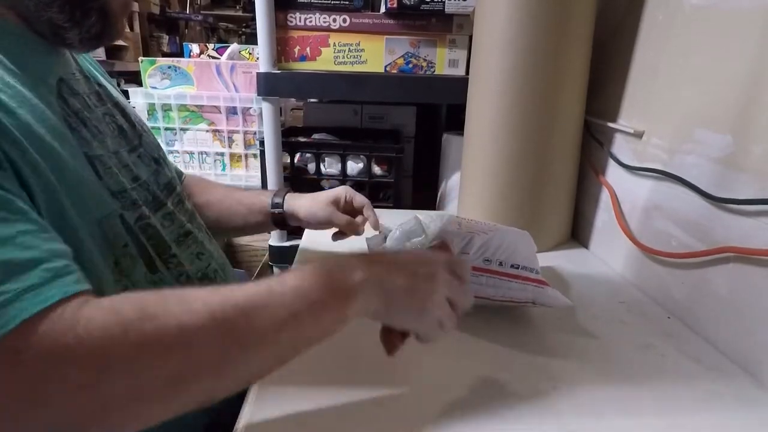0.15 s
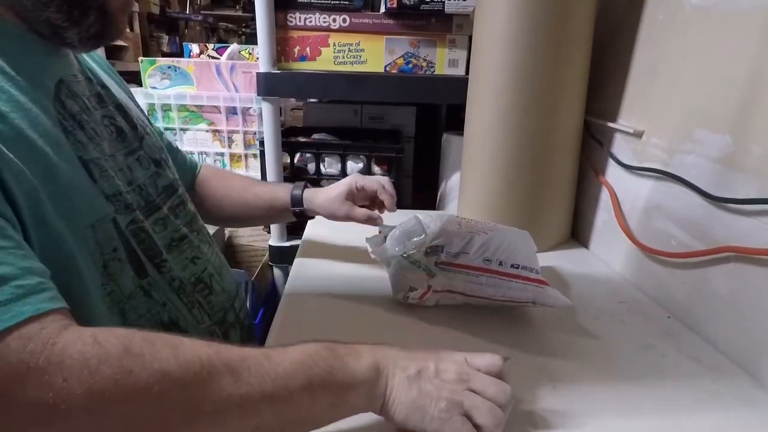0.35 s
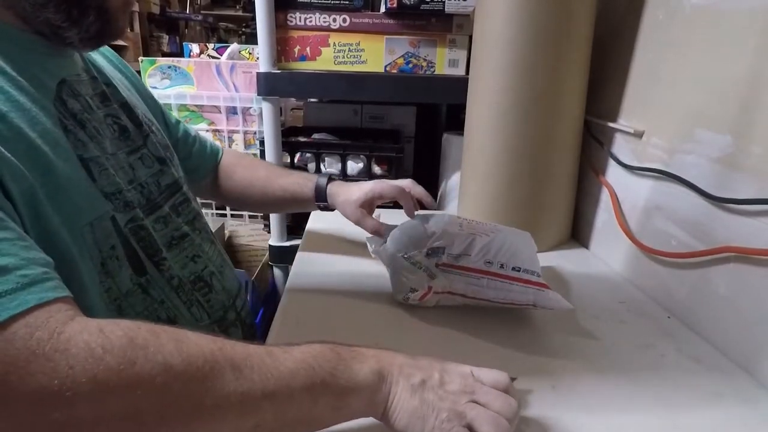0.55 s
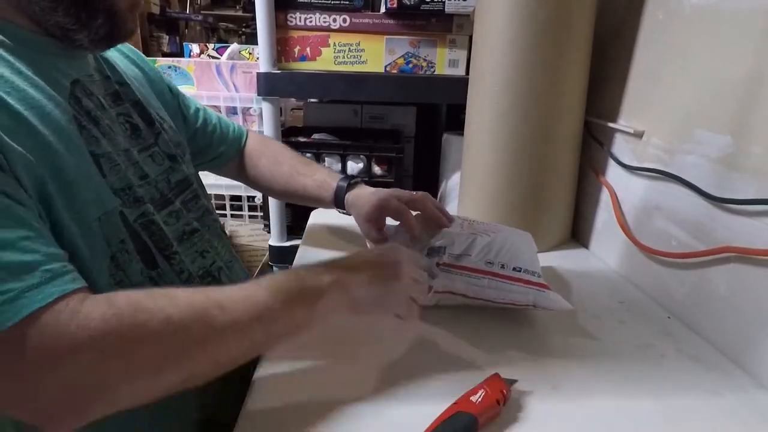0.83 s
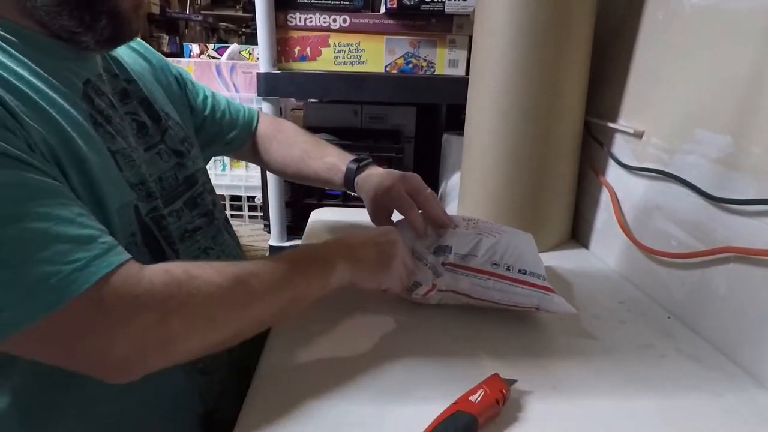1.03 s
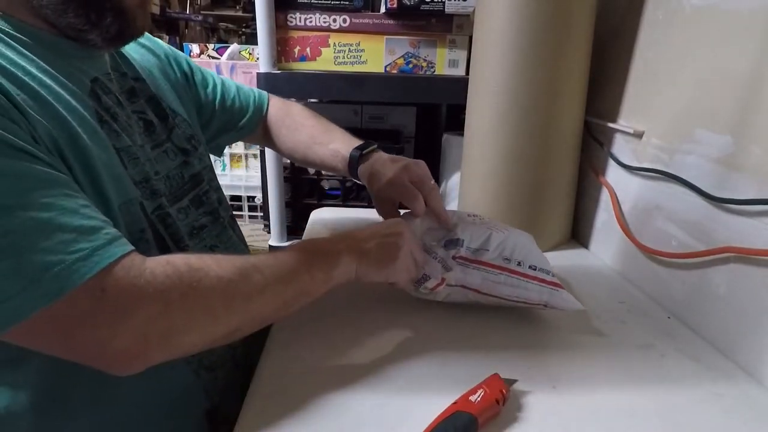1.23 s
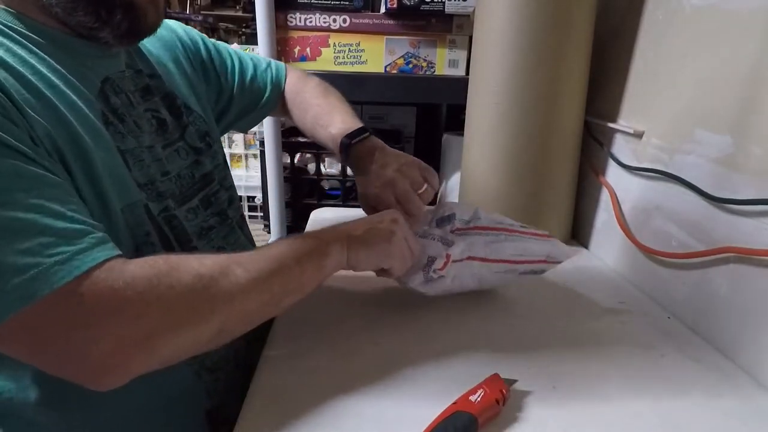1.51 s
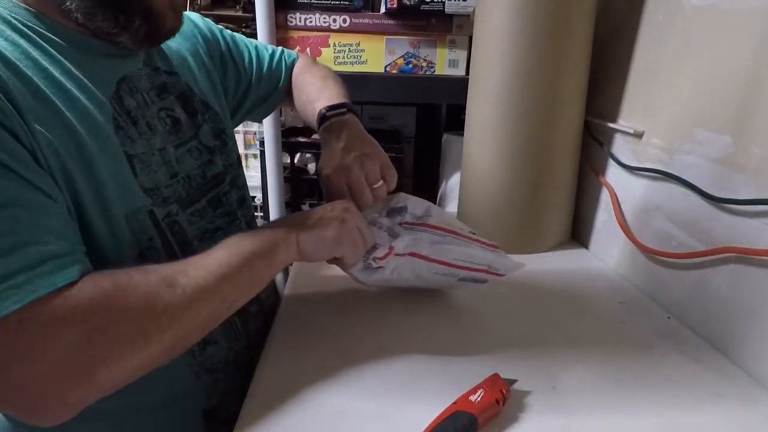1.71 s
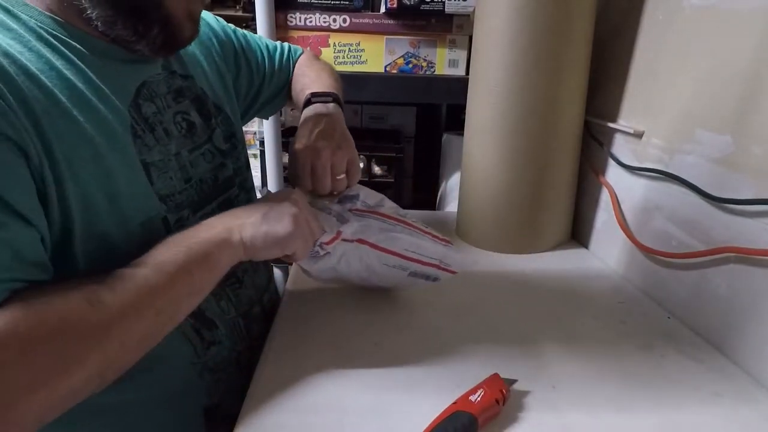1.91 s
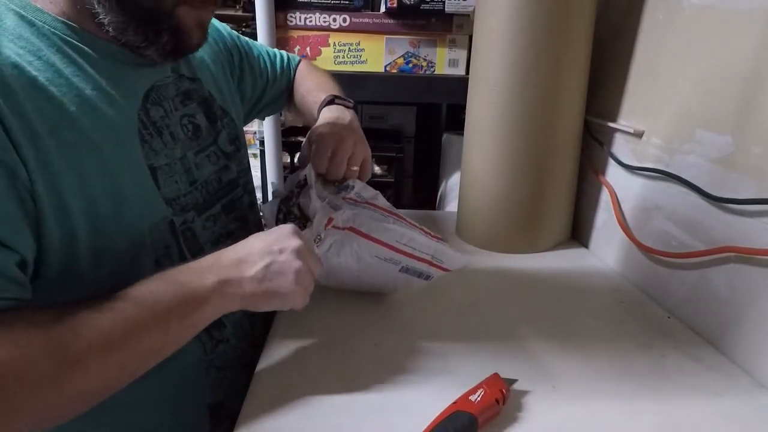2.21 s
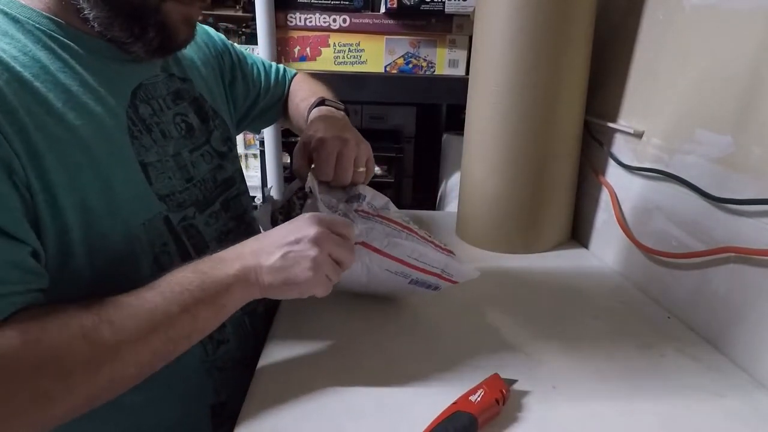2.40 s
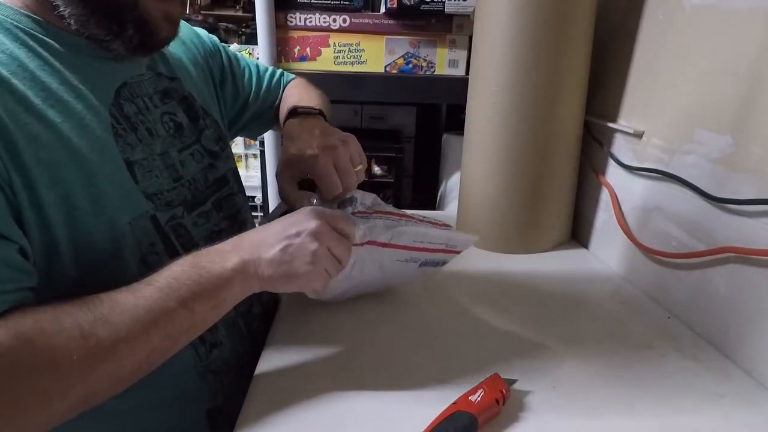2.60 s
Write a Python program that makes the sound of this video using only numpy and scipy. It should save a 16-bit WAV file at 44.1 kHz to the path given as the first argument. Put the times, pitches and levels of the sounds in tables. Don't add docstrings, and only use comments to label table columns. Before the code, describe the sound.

A plastic mailing bag crackles and snaps as hands pull it open, after a knife is set down with soft thuds and scuffs; the seal pops late. Close microphone on the bench in a small room.

```python
import sys
import numpy as np
from scipy import signal
from scipy.fft import rfft, irfft
from scipy.io import wavfile
from scipy.ndimage import uniform_filter1d

SR = 44100
rng = np.random.default_rng(int(sys.argv[2]) if len(sys.argv) > 2 else 0)


def invert_db(level):
    return 10 ** (np.asarray(level, dtype=float) / 20)


def master_out(mix):
    frames = np.transpose(np.atleast_2d(mix))
    ceiling = np.clip(frames, -1, 1)
    pcm = np.round(ceiling * 32767).astype(np.int16)
    wavfile.write(sys.argv[1], SR, pcm)


N = 121275

# [t/s, centre f/Hz, level/dB, extra crease level/dB]
AIR_POCKET = [
    (1.42, 1100, -80, 0.5),
    (1.49, 1300, -60, -1),
    (1.55, 950, -62, 0),
    (1.62, 1000, -53.5, 2.5),
    (1.65, 1100, -53.5, -4),
    (1.71, 1200, -56.5, -2.5),
    (1.76, 1050, -60, 1.5),
    (1.86, 1000, -61, -1.5),
    (1.95, 750, -72, 0.5),
]


def rms_one(x):
    return x / np.sqrt(np.mean(x ** 2) + 1e-20)


def in_time(rows):
    s, *columns = np.transpose(rows)
    return [np.interp(np.arange(N) / SR, s, c) for c in columns]


def at_hz(points, hz):
    points_hz, points_db = np.array(points).T
    return np.interp(np.log(hz), np.log(points_hz), points_db)


def band(x, low_hz, high_hz):
    return signal.sosfilt(signal.butter(2, [low_hz, high_hz], "band", fs=SR, output="sos"), x + 1e-18)


def filtered(x, order, hz, kind="low"):
    return signal.sosfilt(signal.butter(order, hz, kind, fs=SR, output="sos"), x)


def drift(rate_hz):
    r = np.exp(-2 * np.pi * rate_hz / SR)
    wander = signal.lfilter([1], [1, -2 * r, r * r], rng.standard_normal(N + SR))
    return rms_one(wander[SR:])


def ring(clicks, hz, t60):
    r = invert_db(-60 / (t60 * SR))
    w = 2 * np.pi * hz / SR
    return signal.lfilter([0, np.sin(w)], [1, -2 * r * np.cos(w), r * r], clicks + 1e-18)


def coloured(spectrum):
    hz = np.maximum(np.arange(N // 2 + 1) * SR / N, 1)
    gain = invert_db(at_hz(spectrum, hz)) * (hz > spectrum[0][0])
    return rms_one(irfft(rfft(rng.standard_normal(N)) * gain, N))


def floor():
    # [f/Hz, level/dB]
    floor_spectrum = [(29, -33), (50, -11.5), (227, -15.5), (341, -20.5), (1410, -33), (2750, -38.5),
                      (3340, -36), (6080, -40), (15500, -36)]
    return invert_db(-63.5) * coloured(floor_spectrum)


def sway():
    # [t/s, level/dB]
    sway_level = [(0, -48.5), (.2, -59.5), (.24, -37.5), (.35, -30), (.4, -45.5), (.53, -35.5), (.62, -43),
                  (.9, -52), (1.1, -55), (1.3, -62), (1.6, -60.5), (1.95, -56), (2.2, -46.5), (2.48, -49),
                  (2.6, -60), (2.75, -49.5)]
    centre_hz, width_hz, deep_top_hz, deep_db = 34.1, 11.4, 16.1, 3
    level_db, = in_time(sway_level)
    noise = rng.standard_normal((2, N + SR))
    legs = rms_one(band(noise[0], centre_hz - width_hz / 2, centre_hz + width_hz / 2)[SR:])
    deep = rms_one(band(noise[1], 10.2, deep_top_hz)[SR:])
    both = legs + invert_db(deep_db) * deep
    return invert_db(level_db) * both / np.sqrt(uniform_filter1d(both ** 2, size=4000) + 0.05)


def room(x):
    t60_s, level_db, wall_cut_hz = 0.23, -14, 13600
    t = np.arange(SR // 2) / SR
    tail = rng.standard_normal(len(t)) * invert_db(-60 * t / t60_s) * (t > .003)
    tail = filtered(tail, 1, wall_cut_hz)
    return invert_db(level_db) * signal.fftconvolve(x, tail / np.sqrt(np.sum(tail ** 2)))[:N]


def scuffs():
    # [t/s, level/dB, decay/s]
    scuff_events = [
        (0.222, -55, 0.056),
        (0.254, -55, 0.011),
        (0.399, -60, 0.022),
        (.547, -61, 0.03),
        (0.616, -52.5, 0.019),
        (0.723, -57, 0.03),
        (0.854, -60, .02),
    ]
    # [f/Hz, level/dB per Hz]
    scuff_spectrum = [(330, -15), (750, -2.5), (1500, -16.5), (4200, -21.5), (12000, -47)]
    t = np.arange(N) / SR
    shape = np.zeros(N)
    for s, db, decay_s in scuff_events:
        shape += invert_db(db) * (t >= s) * np.exp(-np.maximum(t - s, 0) / decay_s)
    grain = invert_db(3.7 * drift(230))
    return shape * grain * coloured(scuff_spectrum)


def bench():
    # [t/s, level/dB, rocking/s, first blow strength]
    thuds = [
        (0.224, -40, 0.07, 22.5),
        (.398, -45, 0.066, 20),
        (.44, -51, 0.011, 33),
        (.545, -37, 0.023, 18),
        (.572, -43, 0.041, 22.5),
        (.722, -43, 0.027, 37),
        (0.857, -46.5, 0.028, 30),
        (.97, -57.5, 0.095, 18),
    ]
    # [f/Hz, level/dB, t60/s]
    board_modes = [(56, -2.5, 0.25), (114.4, 2.5, 0.19), (150.8, 1.5, 0.15), (195.6, 2.5, 0.17),
                   (237, -3, 0.14), (298, -4.5, 0.067), (401, -7, 0.068), (638, -9.5, 0.028),
                   (850, -18, 0.036), (94, -3.5, 0.11)]
    # [t/s, level/dB]
    drag_level = [
        (1.0, -60.5),
        (1.1, -61),
        (1.33, -64),
        (1.42, -58.5),
        (1.72, -51),
        (1.97, -59),
        (2.07, -50),
        (2.2, -63.5),
        (2.75, -64),
    ]
    rocks_per_s, contact_hz, release_s, drag_cut_hz = 900, 338, 0.043, 136

    def modes(force):
        soft_force = filtered(force, 1, contact_hz)
        out = np.zeros(N)
        for k, (hz, db, t60) in enumerate(board_modes):
            out += invert_db(db) * (-1) ** k * ring(soft_force, hz, t60)
        return out

    t = np.arange(N) / SR
    drive = np.zeros(N)
    touches = (rng.random(N) < rocks_per_s / SR) * rng.choice([-1, 1], N) * np.sqrt(SR / rocks_per_s)
    for s, db, rock_s, blow in thuds:
        drive += invert_db(db) * (t >= s) * np.exp(-np.maximum(t - s - rock_s, 0) / release_s)
        touches[int(s * SR) + 1] = blow
    drag_db, = in_time(drag_level)
    rub = rms_one(band(modes(rng.standard_normal(N)), drag_cut_hz, 1300))
    rub = rub * invert_db(drag_db) * np.clip((t - .9) / 0.15, 0, 1)
    return modes(touches * drive) / np.std(modes(touches)) + rub


def pocket():
    width_hz, grain_db = 500, 3
    hz, level_db, _ = in_time(AIR_POCKET)
    slow = filtered(rng.standard_normal((2, N)), 2, width_hz / 2)
    phase = 2 * np.pi * np.cumsum(hz) / SR
    t = np.arange(N) / SR
    tone = rms_one(slow[0] * np.cos(phase) + slow[1] * np.sin(phase))
    tone = tone * (t > AIR_POCKET[0][0]) * (t < AIR_POCKET[-1][0])
    return invert_db(level_db + grain_db * drift(60)) * tone


def flips():
    # [t/s, peak level/dB, f/Hz]
    flip_events = [(0.162, -59, 2550), (0.296, -57, 2490), (0.604, -58, 3000), (.87, -51, 700),
                   (1.0339, -45, 850), (1.0615, -46, 4270), (1.09, -37.5, 920), (1.104, -38, 3140),
                   (1.126, -39, 1720), (1.168, -38, 3800), (1.179, -45.5, 796), (1.338, -46, 3970),
                   (1.354, -44, 630), (1.579, -40.5, 754), (1.7175, -25, 2440), (1.7194, -28, 3000),
                   (1.755, -40, 5500), (1.8847, -38, 4360), (1.9116, -32, 4130), (1.912, -41.5, 645),
                   (1.952, -30, 4540), (1.959, -42.5, 510), (1.986, -41.5, 604), (1.996, -31, 4280),
                   (2.0165, -40.5, 596), (2.019, -35, 1090), (2.024, -24, 4500), (2.031, -34.5, 600),
                   (2.047, -33, 585), (2.077, -35.5, 450), (2.083, -33, 1310), (2.003, -33.5, 2370),
                   (2.587, -40, 1760), (.225, -48, 900), (.9205, -30, 1740), (.915, -40, 3500),
                   (2.595, -39, 1300), (2.258, -35, 2200), (2.707, -42, 700), (.742, -42, 260),
                   (.582, -38, 300), (2.044, -31.5, 2600), (1.416, -49.5, 814), (2.097, -35, 1110),
                   (2.122, -40, 756), (2.161, -38, 3940), (2.2327, -33.5, 4220), (2.296, -32.5, 4270),
                   (2.4344, -43, 2800), (2.5068, -37, 4580), (2.5608, -40, 1850), (2.705, -38.5, 4300),
                   (2.739, -36, 3200)]
    cycles, crack_db, rebound_s, rebound = 8.3, -5, 0.001088, 0.37
    out, click = np.zeros(N + SR), np.zeros(900)
    click[0] = 1
    click[int(rebound_s * SR)] = -rebound
    for s, db, hz in flip_events:
        tone = band(ring(click, hz, cycles / hz), hz / 1.35, hz * 2)
        crack = band(click, hz, min(4.0 * hz, 16000))
        flip = tone / np.abs(tone).max() + invert_db(crack_db) * crack / np.abs(crack).max()
        i = int((s - .8 / hz) * SR)
        out[i:i + len(click)] += invert_db(db) * flip
    return out[:N]


def creases():
    # [t/s, level/dB, dullness/dB]
    pull = [(0, -69, 6), (.1, -71, -4), (.2, -79, 14), (.715, -73, 9), (.73, -57.5, -13), (.9, -56.5, 5),
            (.925, -49, 0), (.97, -55.5, 8.5), (1.1, -54, 2), (1.23, -53, 5), (1.29, -54, 5.5),
            (1.42, -53.5, 1.5), (1.53, -43, 0.3), (1.65, -47.5, 2), (1.9, -43.5, 3), (2.2, -56.5, -0.5),
            (2.4, -57.5, 3.5), (2.75, -58.5, 5.5)]
    # [t/s, extra level/dB]
    tear = [
        (1.9, -3.5),
        (1.97, -1.5),
        (2.01, 5),
        (2.03, 8),
        (2.075, 13),
        (2.085, -1),
        (2.12, 0),
        (2.17, 2.5),
    ]
    # [f/Hz, level/dB per Hz]
    film_spectrum = [(250, -15), (400, -12.5), (650, -6.5), (2900, -8), (4400, -1), (5600, -13.5),
                     (10500, -9.5), (15900, -17.5)]
    creases_per_s, spread_db, cycles, clump_db, rub_db = 9000, 2.5, 10.4, 2.5, -2.5
    ticks_per_s, tick_db, patch_db = 75, -8, 1.5
    pull_db, dull_db = in_time(pull)
    tear_db, = in_time(tear)
    pocket_db = in_time(AIR_POCKET)[2]

    sizes = invert_db(spread_db * np.minimum(rng.exponential(1, N), 4)) * rng.choice([-1, 1], N)
    clump = invert_db(clump_db * (0.29 * drift(18) + drift(90)))
    born = rng.random(N) < creases_per_s * clump / SR
    pitches, dealt = np.geomspace(330, 15000, 36), rng.integers(0, 36, N)
    wide = invert_db(tick_db) * (rng.random(N) < ticks_per_s / SR) * invert_db(7.7 * rng.random(N))
    patches = [invert_db(patch_db * drift(8.0)) for _ in range(9)]

    crackle = np.zeros(N)
    for k, hz in enumerate(pitches):
        clicks = sizes * (born * (dealt == k) + wide * rng.standard_normal(None))
        t60 = cycles / hz
        rung = patches[k // 4] * ring(ring(clicks, hz, t60), hz, t60)
        crackle += rms_one(rung) * invert_db(at_hz(film_spectrum, hz)) * np.sqrt(hz)
    rub = invert_db(rub_db) * np.sqrt(clump) * np.sqrt(patches[0]) * coloured(film_spectrum)
    film = rms_one(rms_one(crackle) + rub)
    low, high = filtered(film, 2, 1500), filtered(film, 2, 1500, "high")
    return invert_db(pull_db + tear_db + pocket_db) * (high - invert_db(dull_db) * low)


def snaps():
    # [t/s, peak level/dB, dull part/dB, bright part/dB]
    buckles = [(0.0189, -54, -3.5, -12), (0.0563, -45.5, -13, 8.5), (0.0822, -38, -11.5, 2),
               (0.4504, -41, -15.5, -31), (0.5013, -47.5, -9, -5), (0.621, -53, -2.5, 3),
               (0.7228, -47.5, -17, -22), (0.7786, -41, -13.5, 9.5), (0.7971, -42, -11, -19),
               (0.8155, -39, -14, 2), (0.856, -40.5, -11.5, -13), (0.8819, -49, -0.5, -9),
               (0.9203, -28, -16, 0), (0.9314, -38, -14, -10), (1.0061, -34, -14, 0), (1.0335, -58, -3, -6),
               (1.0891, -36, -12.5, 8), (1.1258, -32.5, -18, -1), (1.1483, -37, -37, -8),
               (1.1774, -55, -21, -12), (1.2037, -39, -4, -4), (1.2176, -26, -15.5, 1.5),
               (1.2381, -36, -9, -8), (1.272, -34, -38, 1),
               (1.3291, -37, -10.5, -7), (1.3538, -27.5, -16.5, -26), (1.3577, -39, -12, 11),
            (1.4102, -42, -11.5, 4), (1.4178, -33, -26, 5), (1.4437, -31.5, -13.5, 6.5),
            (1.489, -46, -17, -4), (1.525, -30, -26, -2), (1.5294, -29.5, -35, -19),
            (1.5335, -29, -9, 11.5), (1.5924, -35, -10.5, -15), (1.618, -37, -22, -6),
            (1.7185, -30.5, -43, 3.5), (1.948, -30.5, -18, -28), (1.9787, -36.5, -8.5, -15),
            (2.0015, -29, -27, -10), (2.0147, -21.5, -12.5, 3.5), (2.0214, -29, -6, -17.5),
            (2.0668, -25, -8, -6), (2.1981, -30, -13, 4), (2.2337, -36, -22, 7.5), (2.2584, -38, -44, -30),
            (2.282, -31, -20, 1), (2.341, -32, -19, -12), (2.4647, -33.5, -18, -4),
            (2.4817, -36, -10.5, 11.5), (2.5853, -41, -24, -7), (2.6337, -35.5, -27, -18),
            (2.676, -36.5, -22, -2), (2.7299, -32, -12, -21)]
    # decay/s, band edges/Hz
    layers = ((0.0045, 400, 2300), (0.0019, 1900, 6130), (0.0019, 6000, 12850))
    dull_trim_db, bright_trim_db = 7, -8
    rows, t = np.array(buckles), np.arange(600) / SR
    ticks = rng.standard_normal((len(rows), 600)) ** 3
    out = np.zeros(N + SR)
    for (s, db, dull_db, bright_db), tick in zip(rows, ticks):
        gains_db = (dull_db + dull_trim_db, 0, bright_db + bright_trim_db)
        i = int(s * SR)
        for (decay_s, low_hz, high_hz), gain_db in zip(layers, gains_db):
            burst = band(np.tanh(tick / 4) * np.exp(-t / decay_s), low_hz, high_hz)
            burst = burst + invert_db(-2) * band(burst, 3200, 5000)
            out[i:i + len(t)] += invert_db(db + gain_db) * burst / np.abs(burst).max()
    return out[:N]


def pop():
    # [f/Hz, level/dB, t60/s]
    bag_modes = [(338, -19, 0.0069), (450, 2, 0.015), (557, -1, 0.016), (656, -4.5, 0.012), (796, 6, 0.011),
                 (973, 3, 0.018), (1380, -5, 0.023), (1627, -0.5, 0.041), (2516, 3, 0.024),
                 (2850, 3, 0.023), (3430, -7.5, 0.017)]
    pop_s, pop_db, rattle_s = 2.0662, -14, 0.0048
    recoil_s, recoil, flap_db, flap_s = .0007, 2.2, -35.5, 0.016
    t = np.arange(N) / SR - pop_s
    after = np.maximum(t, 0)
    force = 0.089 * rng.standard_normal(N) * (t > 0) * np.exp(-after / rattle_s)
    force[int(pop_s * SR)] = 1
    force[int((pop_s + recoil_s) * SR)] = -recoil
    out = sum(invert_db(db) * ring(force, hz, t60) for hz, db, t60 in bag_modes)
    out = band(out, 240, 6000)
    flap = rms_one(band(rng.standard_normal(N), 370, 3000)) * (t > 0) * np.exp(-after / flap_s)
    return invert_db(pop_db) * out / np.abs(out).max() + invert_db(flap_db) * flap


def scene():
    bag = snaps() + creases() + pop() + flips()
    board = bench() + scuffs() + sway()
    return (bag + room(bag) + board + floor() + pocket())[None]


def top_cut(x):
    return signal.sosfilt(signal.butter(12, 16420, fs=SR, output="sos"), x)


def record(dry):
    step_hz, step_db, cutoff_hz = 10840, -6, 16700
    top = signal.sosfiltfilt(signal.butter(8, step_hz, "high", fs=SR, output="sos"), dry)
    heard = dry - (1 - invert_db(step_db)) * top
    mix = signal.sosfilt(signal.cheby2(10, 60, cutoff_hz, fs=SR, output="sos"), heard)
    return top_cut(mix)


dry = scene()
out = record(dry)
master_out(out)
```